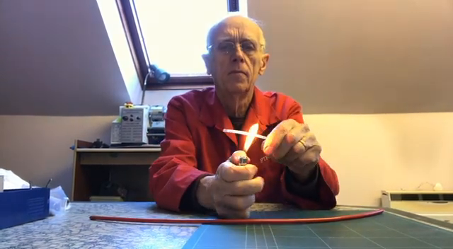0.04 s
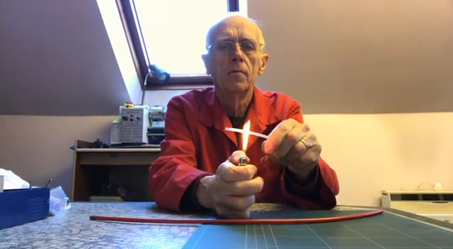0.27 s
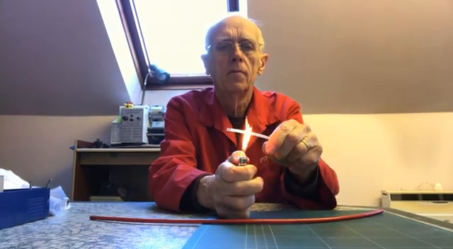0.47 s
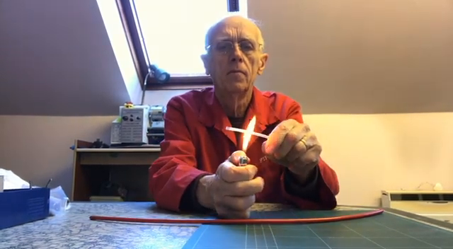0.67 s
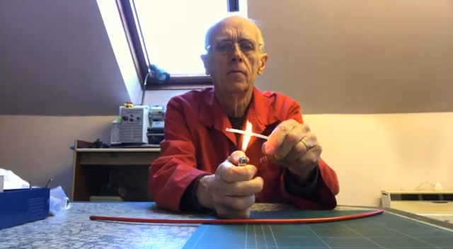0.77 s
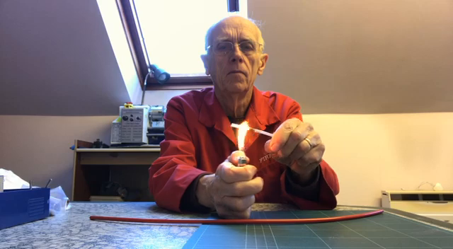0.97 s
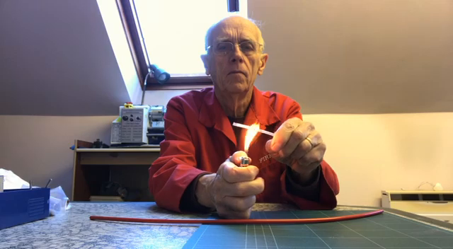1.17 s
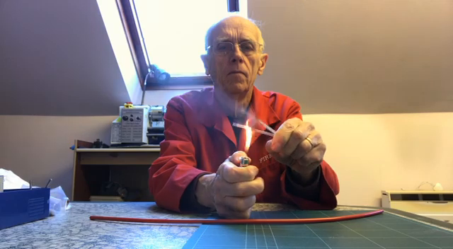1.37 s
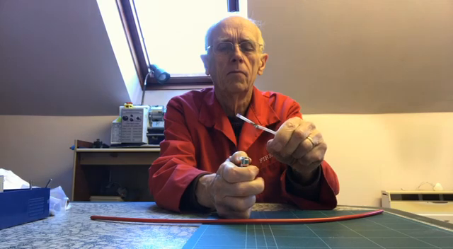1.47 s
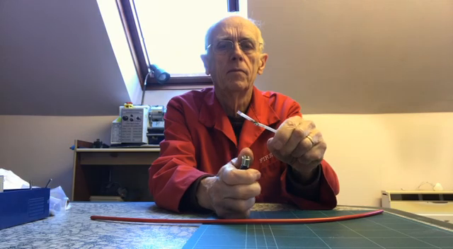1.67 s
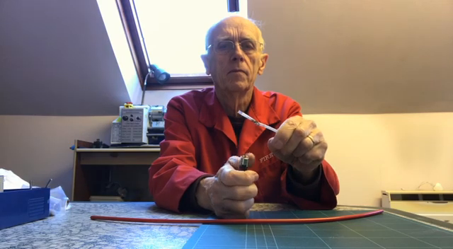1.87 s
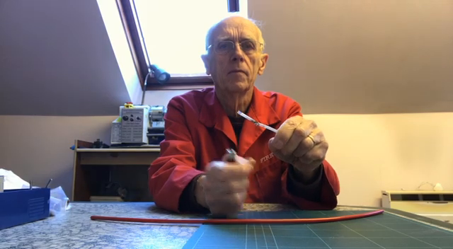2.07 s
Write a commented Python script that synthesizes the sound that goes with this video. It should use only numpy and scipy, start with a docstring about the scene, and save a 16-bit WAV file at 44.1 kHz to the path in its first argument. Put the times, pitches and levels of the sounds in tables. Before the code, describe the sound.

One hard, overloaded bang from a bursting thin plastic tube, with faint steady ticking around it

```python
"""A thin pressurised plastic tube, softened by a flame, bursts in a small attic room, close enough to overload
the microphone: a short pressure pulse, struck modes, escaping air that whistles, and noise dying band by band.
A short lead-in of resonant noise, about 23 ms, swells up to the burst.
A mechanism ticks three times a second as decaying sines.
Small clicks, thuds and rustles lie over room noise, low rumble and the hiss of the flame's gas jet.
The gain control ducks after the burst and recovers."""
import sys
import numpy as np
from scipy import signal
from scipy.io import wavfile
from scipy.ndimage import uniform_filter1d

SR = 44100
rng = np.random.default_rng(int(sys.argv[2]) if len(sys.argv) > 2 else 0)


def unload_wav(signal):
    """Save mono or channel-first audio to the path in sys.argv[1] as 16-bit WAV at rate SR, clipped to [-1, 1]."""
    wavfile.write(
        sys.argv[1],
        SR,
        np.round(np.clip(np.atleast_2d(signal).T, -1, 1) * 32767).astype(np.int16),
    )


def makeup_ratio(level_db):
    """Linear amplitude ratio for a level in decibels (20 dB per factor of ten)."""
    decades = np.asarray(level_db, float) / 20
    return 10 ** decades


N = 94109

# Levels are those at the microphone, ahead of its filter and gain control.
BURST_S, SHOCK_DB, SHOCK_CYCLE_S = 1.3822, 0, .001
# Modes of tube and table: (frequency [Hz], level relative to the blow [dB], t60 [s])
KNOCK_MODES = [(310, -4, .09), (1050, -4, .06), (1350, -2, .09), (3450, -2, .04)]
# Blows on those modes, a weaker early knock, then the one at the pulse: (time [s], level [dB])
KNOCK_BLOWS = [(1.373, -10), (1.3822, -8)]
# Colour of the escaping air and the room's reply: (frequency [Hz], relative density [dB per Hz])
ROOM_COLOUR = [(35, -59.5), (60, -29), (279, -24), (560, -8.5), (741, -13), (1130, -8), (2790, -10),
               (6450, -1.5), (8940, -11), (10800, -19), (15600, -20)]
# Decay of the small room: (frequency [Hz], t60 [s])
ROOM_DECAY = [(100, .17), (300, .185), (1000, .185), (3000, .175), (6500, .185), (12000, .17)]
ROOM_DELAY_S, ROOM_DB, ROOM_RISE_S, JET_HOLD_S = .0023, 7, .001, .027
ECHO_S, ECHO_DB, ECHO_T60_S = 1.4395, -2, .02
WHISTLE_HZ, WHISTLE_WIDTH_HZ, WHISTLE_DB = 6400, 800, 3
WHISTLE_START_S, WHISTLE_END_S, WHISTLE_RISE_T60_S, WHISTLE_T60_S = 1.391, 1.421, .03, .07
# Colour of the slower late hiss: (frequency [Hz], relative density [dB per Hz])
LATE_COLOUR = [(200, -20), (600, -8), (1500, -8), (2600, -16), (4000, -6), (6700, 0), (9000, -10),
               (11000, -30), (16000, -40)]
LATE_DB, LATE_T60_S, LATE_END_S, LATE_CUT_T60_S = -30, .7, 1.665, .18

# Level of the lead-in noise: (time [s], level [dB])
LEAD_LEVEL = [(1.3612, -40), (1.362, -27), (1.366, -27), (1.371, -23.5), (1.374, -16), (1.379, -18),
              (1.383, -16.5), (1.385, -60)]
# Resonances in the lead-in noise: (centre [Hz], width [Hz], relative level [dB])
LEAD_BANDS = [(310, 100, -2), (1060, 120, -2), (1350, 90, -3), (1800, 400, -14), (3450, 350, -3),
              (6200, 500, -4), (7600, 900, -14)]
LEAD_WHITE_S, LEAD_WHITE_DB, LEAD_WHITE_T60_S, LEAD_WHITE_FLOOR_DB = 1.3617, -22, .025, -39

TICK_COUNT, TICK_START_S, TICK_PERIOD_S, TICK_DB = 7, .0108, .33365, -37.5
# Modes of the ticking mechanism: (frequency [Hz], level relative to the tick [dB], t60 [s])
TICK_MODES = [(400, -9, .012), (700, -10, .01), (1050, -8, .01), (1535, 1.5, .02), (3100, -20, .004),
              (7200, -15, .008)]
# One tick rattles twice more: (time [s], level [dB])
TICK_BOUNCES = [(.6809, -37), (.6826, -43)]

# Small stray clicks: (time [s], level [dB], frequency [Hz], t60 [s])
CLICKS = [(.312, -40, 3000, .001), (.312, -41, 12000, .001), (.6809, -44, 1200, .03),
          (1.668, -58, 4200, .01), (1.632, -48, 570, .12), (2.085, -47, 500, .015)]
# Soft low thuds on the table: (time [s], level [dB], frequency [Hz], t60 [s])
THUDS = [(1.528, -27, 70, .08), (1.528, -33, 150, .04), (1.735, -37, 90, .05), (.63, -51.5, 110, .06),
         (1.615, -44, 120, .08), (2.03, -46, 65, .3), (2.08, -46, 70, .3)]
# Faint swells, each lasting 1.25 times (to - from): (from [s], to [s], level [dB], centre [Hz], width [Hz])
RUSTLES = [(1.625, 1.665, -53, 1000, 1200), (2.09, 2.13, -64, 2900, 1000), (.635, .71, -73, 2440, 60)]

# Gas jet of the flame: (centre [Hz], width [Hz], level [dB])
GAS_HISS = [(1400, 400, -68), (7050, 900, -69)]
FLAME_OUT_S, GAS_AFTER_DB = 1.4, -6
# Colour of the room noise: (frequency [Hz], relative density [dB per Hz])
FLOOR_COLOUR = [(15, -45), (25, -17), (75, 1), (152, -14.5), (254, -14), (765, -23), (1310, -22),
                (1760, -28.5), (5040, -34), (7160, -31.5), (8410, -41), (13700, -35.5), (15600, -46)]
FLOOR_DB = -54.5
# Wavering low tones: (centre [Hz], width [Hz], level [dB])
RUMBLE = [(66, 4, -57), (90, 4, -64), (50, 10, -63), (112, 8, -66)]
# Narrow high hiss: (centre [Hz], width [Hz], level [dB])
WHINES = [(11850, 25, -80), (13500, 700, -76), (14200, 300, -84)]

MIC_LOW_HZ, MIC_HIGH_HZ = 35, 15000
AGC_THRESHOLD_DB, AGC_DEPTH_DB, AGC_HOLD_S, AGC_RELEASE_DB_PER_S, AGC_SMOOTH_S = -23, 12.5, .3, 34.5, .06
CLIP_LEVEL, CLIP_HARDNESS = 1.0, 6.0
SELF_NOISE_DB = -78   # converter hiss after the gain control


def rms_one(x):
    """Scale to rms 1."""
    return x / np.sqrt(np.mean(x ** 2) + 1e-20)


def at_hz(points, hz):
    """Read a table on a log-frequency axis."""
    table_hz, values = np.transpose(points)
    return np.interp(np.log(hz), np.log(table_hz), values)


def fade(start_s, t60):
    """Silent before the start, then an exponential decay."""
    t = np.arange(N) / SR - start_s
    return (t >= 0) * makeup_ratio(-60 * np.maximum(t, 0) / t60)


def held_fade(end_s, t60):
    """Full level until the end, then an exponential decay."""
    return makeup_ratio(-60 * np.maximum(np.arange(N) / SR - end_s, 0) / t60)


def struck(s, db, hz, t60):
    """A struck mode: a decaying sine started at time s."""
    return makeup_ratio(db) * fade(s, t60) * np.sin(2 * np.pi * hz * (np.arange(N) / SR - s))


def narrow(hz, width_hz):
    """Noise passed twice through one resonance; rms 1."""
    radius = np.exp(-np.pi * width_hz / SR)
    poles = [1, -2 * radius * np.cos(2 * np.pi * hz / SR), radius ** 2]
    x = rng.standard_normal(N + SR // 2)
    for _ in range(2):
        x = signal.lfilter([1, 0, -1], poles, x)
    return rms_one(x[SR // 2:])   # the first half second lets the filter settle


def narrow_sum(rows):
    """Sum of narrow noises, each at its own level."""
    return sum(makeup_ratio(db) * narrow(hz, width) for hz, width, db in rows)


def bands(colour):
    """Third-octave noise bands with their centres; the sum has rms 1."""
    edges = 22 * 2 ** np.arange(0, 9.7, 1 / 3)
    centres = np.sqrt(edges[1:] * edges[:-1])
    white = rng.standard_normal((2, N + SR // 2))   # neighbouring bands use different noise
    out = []
    for k, hz in enumerate(centres):
        sos = signal.butter(2, edges[k:k + 2], "band", fs=SR, output="sos")
        out.append(makeup_ratio(at_hz(colour, hz)) * signal.sosfilt(sos, white[k % 2])[SR // 2:])
    out = np.array(out)
    return out / np.sqrt(np.mean(out.sum(axis=0) ** 2)), centres


def coloured(colour):
    """Broad noise of one colour; rms 1."""
    return bands(colour)[0].sum(axis=0)


def shock():
    """Pressure pulse of the burst: two sine cycles, negative first, growing in strength."""
    phase = (np.arange(N) / SR - BURST_S) / SHOCK_CYCLE_S
    pulse = -np.sin(2 * np.pi * phase) * (1 + phase) / 2
    return makeup_ratio(SHOCK_DB) * np.where((phase >= 0) & (phase < 2), pulse, 0)


def knocks():
    """Each blow rings the modes of tube and table as decaying sines."""
    return sum(struck(s, level + db, hz, t60) for s, level in KNOCK_BLOWS for hz, db, t60 in KNOCK_MODES)


def room_reply():
    """Escaping air holds, then the room dies away band by band; one distinct echo follows."""
    start = BURST_S + ROOM_DELAY_S
    noise, centres = bands(ROOM_COLOUR)
    reply = sum(band * held_fade(start + JET_HOLD_S, at_hz(ROOM_DECAY, hz)) for band, hz in zip(noise, centres))
    begun = np.arange(N) / SR - BURST_S >= ROOM_DELAY_S
    rise = 1 - fade(start, 7 * ROOM_RISE_S)   # a t60 is about 7 time constants
    echo = makeup_ratio(ECHO_DB) * noise.sum(axis=0) * fade(ECHO_S, ECHO_T60_S)
    return makeup_ratio(ROOM_DB) * reply * begun * rise + echo


def whistle():
    """The jet whistles in the split: narrow noise that rises, then decays."""
    rise = 1 - held_fade(WHISTLE_START_S, WHISTLE_RISE_T60_S)
    envelope = rise * held_fade(WHISTLE_END_S, WHISTLE_T60_S)
    return makeup_ratio(WHISTLE_DB) * narrow(WHISTLE_HZ, WHISTLE_WIDTH_HZ) * envelope


def late_hiss():
    """Slowly decaying coloured noise, which then drops away faster."""
    envelope = fade(BURST_S + ROOM_DELAY_S, LATE_T60_S) * held_fade(LATE_END_S, LATE_CUT_T60_S)
    return makeup_ratio(LATE_DB) * coloured(LATE_COLOUR) * envelope


def burst():
    """The tube bursts: pulse, struck modes, air and room, whistle and late hiss."""
    return shock() + knocks() + room_reply() + whistle() + late_hiss()


def lead_in():
    """Lead-in: decaying white noise over a steady floor, plus noise in a few resonances."""
    s, db = np.transpose(LEAD_LEVEL)
    level = makeup_ratio(np.interp(np.arange(N) / SR, s, db, left=-200, right=-200))
    sounding = level > 1e-9
    white_level = makeup_ratio(LEAD_WHITE_DB) * fade(LEAD_WHITE_S, LEAD_WHITE_T60_S) + makeup_ratio(LEAD_WHITE_FLOOR_DB)
    white = white_level * sounding * rng.standard_normal(N)
    return white + level * rms_one(narrow_sum(LEAD_BANDS))


def ticks():
    """Evenly spaced ticks and two bounces ring the same short modes, each mode varying in level."""
    rows = [(TICK_START_S + k * TICK_PERIOD_S, TICK_DB) for k in range(TICK_COUNT)] + TICK_BOUNCES
    return sum(struck(s, level + db + rng.normal(0, 1), hz, t60)
               for s, level in rows for hz, db, t60 in TICK_MODES)


def clicks_and_thuds():
    """Small stray clicks and low thuds on the table, each one decaying sine."""
    return sum(struck(*row) for row in CLICKS + THUDS)


def rustles():
    """Brief soft swells of noise in one band, shaped by half a sine."""
    t = np.arange(N) / SR
    out = np.zeros(N)
    for start, end, db, hz, width in RUSTLES:
        swell = np.sin(np.pi * np.clip((t - start) / (end - start) * .8, 0, 1))
        out += makeup_ratio(db) * narrow(hz, width) * swell
    return out


def gas_jet():
    """Narrow noise of the flame's gas jet, weaker once the flame is blown out."""
    level = np.where(np.arange(N) / SR < FLAME_OUT_S, 1, makeup_ratio(GAS_AFTER_DB))
    return narrow_sum(GAS_HISS) * level


def background():
    """Broad room noise with wavering low tones and narrow hiss, all steady filtered noise."""
    return makeup_ratio(FLOOR_DB) * coloured(FLOOR_COLOUR) + narrow_sum(RUMBLE + WHINES)


def scene():
    """Everything in the attic room at one microphone."""
    near = burst() + lead_in() + ticks() + clicks_and_thuds()
    return (near + rustles() + gas_jet() + background())[None]


def gain_control(x):
    """Loud sound pulls the gain down; it holds, then recovers at a steady rate in dB."""
    t = np.arange(N) / SR
    power = uniform_filter1d(x[0] ** 2, size=441)   # 10 ms mean
    level = 10 * np.log10(np.maximum(power, 1e-12))
    want = np.clip(level - AGC_THRESHOLD_DB, 0, AGC_DEPTH_DB)
    want = want + AGC_RELEASE_DB_PER_S * AGC_HOLD_S * (level > AGC_THRESHOLD_DB)   # the excess makes the hold
    released = AGC_RELEASE_DB_PER_S * t
    held = np.maximum.accumulate(want + released) - released
    r = np.exp(-1 / (AGC_SMOOTH_S * SR))
    cut_db = signal.lfilter([1 - r], [1, -r], np.clip(held, 0, AGC_DEPTH_DB))
    return x * makeup_ratio(-cut_db)


def overload(x):
    x = x / CLIP_LEVEL
    return CLIP_LEVEL * x / (1 + np.abs(x) ** CLIP_HARDNESS) ** (1 / CLIP_HARDNESS)


def band_limit(x):
    """A steep low-pass at the top of the band."""
    return signal.sosfilt(signal.butter(12, 15780, fs=SR, output="sos"), x)


def record(dry):
    """The microphone limits the range, the gain control ducks, peaks clip and converter hiss is added."""
    sos = signal.butter(2, [MIC_LOW_HZ, MIC_HIGH_HZ], "band", fs=SR, output="sos")
    x = overload(gain_control(signal.sosfilt(sos, dry)))
    mix = x + makeup_ratio(SELF_NOISE_DB) * rng.standard_normal(x.shape)
    return band_limit(mix)


dry = scene()
out = record(dry)
unload_wav(out)
```